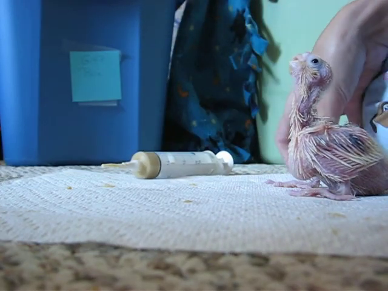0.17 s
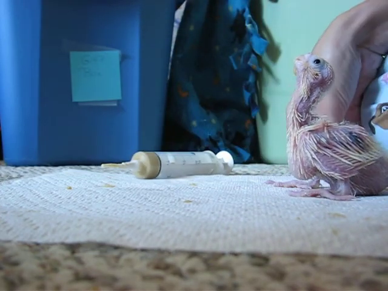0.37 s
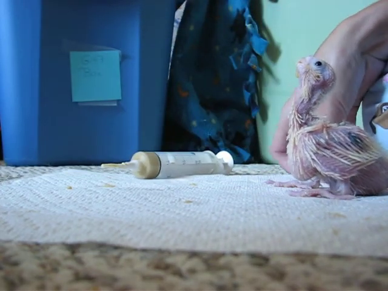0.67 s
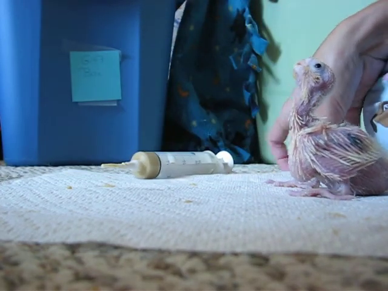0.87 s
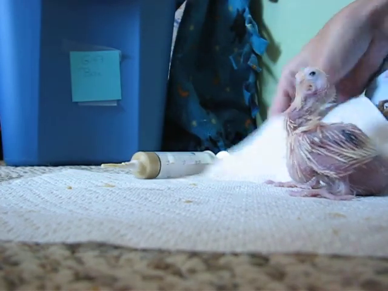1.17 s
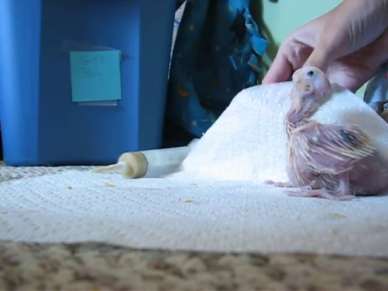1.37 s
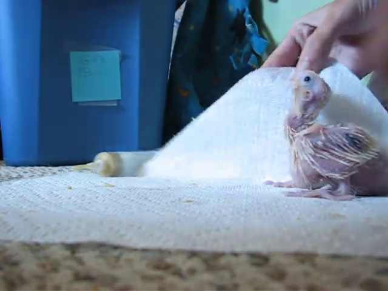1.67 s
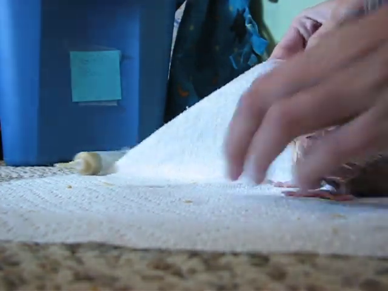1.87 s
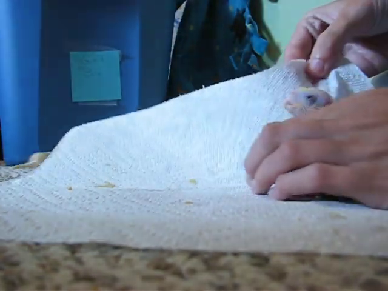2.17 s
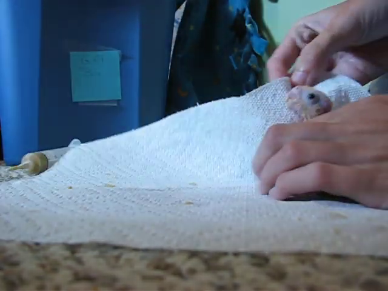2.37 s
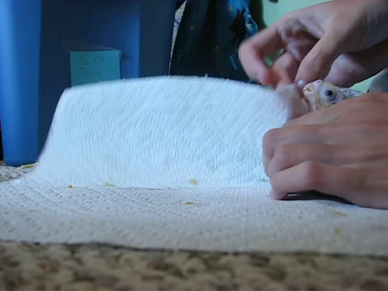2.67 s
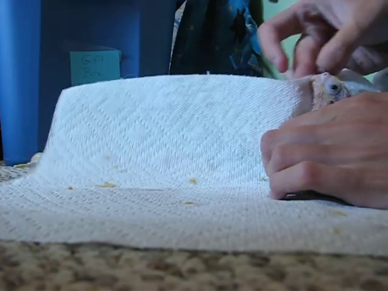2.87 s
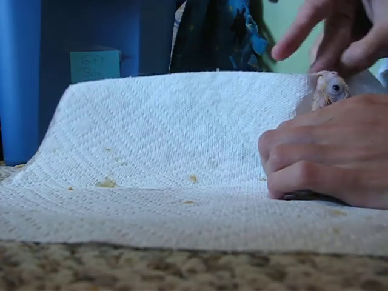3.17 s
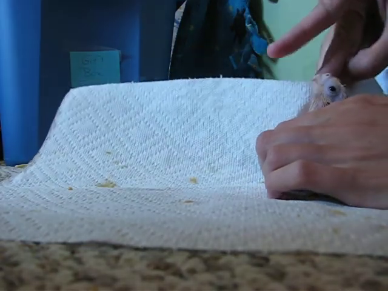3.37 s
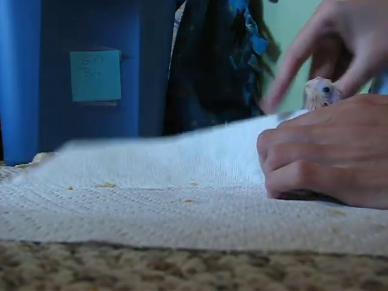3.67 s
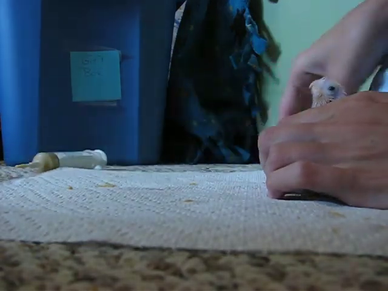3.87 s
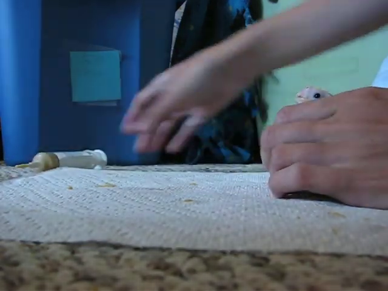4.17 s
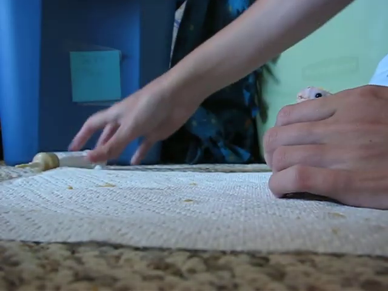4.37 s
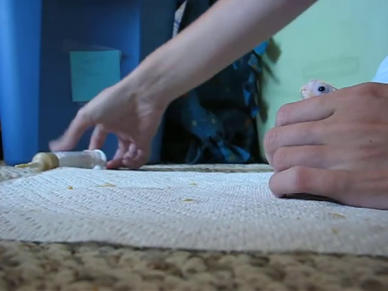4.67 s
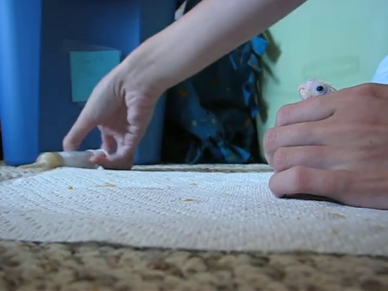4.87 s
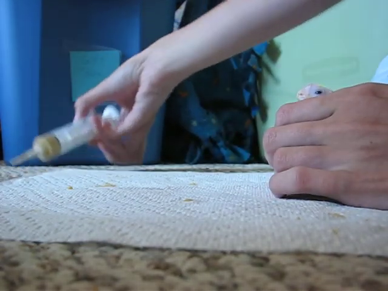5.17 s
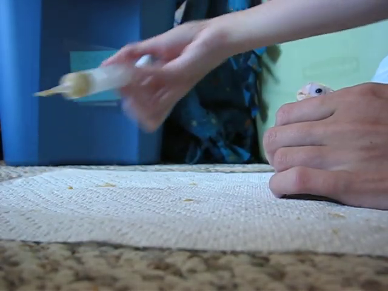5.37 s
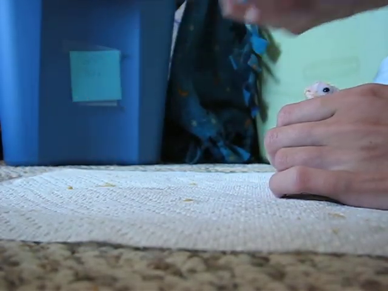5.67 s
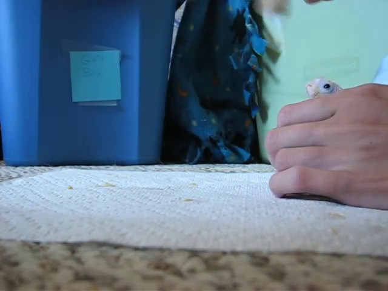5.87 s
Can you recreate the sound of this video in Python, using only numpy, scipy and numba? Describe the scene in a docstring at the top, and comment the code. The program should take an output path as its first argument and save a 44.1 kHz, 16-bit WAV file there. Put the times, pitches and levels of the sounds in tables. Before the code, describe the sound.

A baby bird squeaks thinly, then begs in raspy hissing calls over paper towel rustle, small taps and a faint appliance hum.

```python
"""A cockatiel chick begs on a paper towel, close to a small stereo camera; an appliance hums throughout.
Hands slide and fold the towel and things tap on the counter. From 0.8 s come thin squeaks that break up.
From 2.8 s the calls are rasps: each push of air drives irregular pulses through throat resonances
that glide as the beak opens and shuts. After 5 s a plastic syringe clicks, then comes a last long rasp."""
import sys
import numpy as np
from scipy import signal
from scipy.fft import rfft, irfft
from scipy.io import wavfile
from scipy.ndimage import uniform_filter1d
from numba import njit

SR = 44100
rng = np.random.default_rng(int(sys.argv[2]) if len(sys.argv) > 2 else 0)


def log_audio(samples):
    """Write samples as a 16-bit WAV file to the path given in sys.argv[1]."""
    # one column per channel
    frames = np.atleast_2d(samples).T
    # limit to full scale, then quantise
    limited = np.clip(frames, -1, 1)
    pcm = np.round(limited * 32767).astype(np.int16)
    wavfile.write(sys.argv[1], SR, pcm)


N = 264864
T = np.arange(N) / SR


def undb(db):
    """Decibels to gain."""
    return 10 ** (np.asarray(db) / 20)


def unit(x):
    """Scale to rms 1."""
    return x / np.sqrt(np.mean(x ** 2))


def ramp(start_s, length_s):
    """Linear rise from 0 to 1, at least 1 ms long."""
    return np.clip((T - start_s) / max(length_s, .001), 0, 1)


def walk(rate_hz):
    """Smooth random wander, rms 1."""
    step = max(int(SR / rate_hz), 2)
    stairs = np.repeat(rng.standard_normal(N // step + 1), step)
    return unit(uniform_filter1d(stairs, step)[:N])


def colour(x, outline, size=4096):
    """Minimum-phase filter from an outline of (f/Hz, level/dB)."""
    hz, db = np.transpose(outline)
    grid_hz = np.maximum(np.fft.rfftfreq(size, 1 / SR), 1)
    cepstrum = irfft(np.log(undb(np.interp(np.log(grid_hz), np.log(hz), db))))
    cepstrum[1:size // 2] *= 2
    cepstrum[size // 2 + 1:] = 0
    return signal.oaconvolve(x, irfft(np.exp(rfft(cepstrum))))[:len(x)]


@njit
def svf(x, hz, width_hz):
    """State-variable band-pass with a moving centre."""
    y = np.empty(len(x))
    band_state, low_state = 0., 0.
    for i in range(len(x)):
        g, damping = np.tan(np.pi * hz[i] / SR), width_hz / hz[i]
        band = (band_state + g * (x[i] + 1e-18 - low_state)) / (1 + g * (g + damping))
        band_state = 2 * band - band_state
        low_state += 2 * g * band
        y[i] = damping * band
    return y


def ring(x, hz, width_hz):
    """One resonance, gain 1 at its centre."""
    return svf(x, np.clip(hz, 20, SR / 2 - 2000) * np.ones(len(x)), float(width_hz))


def appliance():
    """Motor tones waver over a narrow fan rush."""
    # hum: f/Hz, rms level/dB, left minus right/dB
    tones = [(117.7, -68, -1), (139, -69.5, 1), (324, -56, -5.5)]
    hum = 0
    for hz, db, pan_db in tones:
        phase = 2 * np.pi * np.cumsum(hz * (1 + 0.00264 * walk(3.19))) / SR
        stereo_db = db + 0.039 * walk(2.25) + np.array([[pan_db], [-pan_db]]) / 2
        hum += np.sqrt(2) * np.sin(phase) * undb(stereo_db)
    rush = unit(ring(ring(rng.standard_normal(N), 297, 49), 349, 93))
    return hum + rush * undb([[-66.5], [-63]])


def noise_floor(rumble_db=-64.5, hiss_db=-59):
    """Rumble common to both microphone ports, hiss independent in each."""
    # room noise and microphone hiss: f/Hz, relative density/dB
    hiss_outline = [(30, -5), (300, 4), (700, 9.5), (1300, 1.5), (2500, 4), (5000, 1), (7800, 4),
                    (9500, -3), (12000, -6.5), (16000, -12.5)]
    rumble_outline = [(15, -15), (70, -2.5), (110, -5), (210, -5.5), (500, -11.5), (2000, -17),
                      (8000, -91)]
    rumble = unit(colour(rng.standard_normal(N), rumble_outline))
    hiss = np.array([unit(colour(rng.standard_normal(N), hiss_outline)) for _ in range(2)])
    return undb(rumble_db) * rumble + undb(hiss_db) * hiss


def blips(hz=366, period_s=.099, half_s=.016, fade_db_per_s=7, pan_db=-7):
    """Fading runs of soft, even blips, perhaps a small motor stepping."""
    # blip runs: start/s, end/s, first level/dB
    runs = [(0.187, .72, -53), (3.158, 3.6, -57.5), (4.052, 4.5, -58.5), (5.49, 5.95, -58)]
    gain = np.zeros(N)
    for start_s, end_s, db in runs:
        for s in np.arange(start_s, end_s, period_s):
            gain += undb(db - fade_db_per_s * (s - start_s)) * np.exp(-((T - s) / half_s) ** 2)
    phase = 2 * np.pi * np.cumsum(hz * (1 + 0.01415 * walk(8.6))) / SR
    return gain * np.sqrt(2) * np.sin(phase) * undb(np.array([[pan_db], [-pan_db]]) / 2)


def room(x, t60_s, wet_db, size=16000):
    """Short tail of scattered reflections, different at each port."""
    t = T[:size]
    tail = rng.standard_normal((2, size)) * np.exp(-np.log(1000) * t / t60_s) * (t > .002)
    tail *= undb(wet_db) / np.sqrt(np.sum(tail ** 2, axis=1, keepdims=True))
    return signal.oaconvolve(x[None], tail, axes=1)[:, :N]


def clutter(x):
    """Scatter from things nearby, shifting as head and hands move."""
    turn_rad = 2 * np.pi * 1.3 * T + .5 * walk(6)
    return sum(share * room(x, t60_s=.035, wet_db=-10.5)
               for share in (np.cos(turn_rad), np.sin(turn_rad)))


def echoes(x):
    """Early reflections comb the sound and blur its pulses."""
    # hard surfaces near the bird: delay/ms, signed gain
    surfaces = [(1.38, .05), (1.92, -.06), (2.36, .13), (2.56, -.13), (3.08, .08), (4.71, -.1), (12.8, .04)]
    return x + sum(gain * np.pad(x, (round(ms * SR / 1000), 0))[:N] for ms, gain in surfaces)


def nook(x):
    """The space between bird, boxes and counter adds narrow resonances."""
    # nook modes: f/Hz, width/Hz, level/dB re direct
    modes = [(980, 40, -4.5), (1560, 120, -14), (2100, 120, -21), (2810, 100, -16), (4120, 210, -7),
             (6500, 190, -13), (6750, 120, -15)]
    return x + sum(undb(db) * ring(x, hz, width_hz) for hz, width_hz, db in modes)


def ports(x):
    """Sound bends round the camera and reaches each port with its own level and lag."""
    # port response: f/Hz, left minus right/dB, left lead/rad
    response = [(100, -1, -4), (373, -3.5, -8), (670, 1.5, 0.44), (1106, -5, -0.5), (1450, 2, 0.7),
                (1670, -4.5, -0.9), (2350, -5, -0.6), (2720, -1.5, -2.5), (3560, -7.5, 1.2),
                (3730, -8, 1.5), (4530, 3, 0.4), (5230, 2.5, -1.1), (6800, -0.5, -1.62),
                (9500, -8.5, -1.77), (13000, 3.5, -1.5)]
    hz, pan_db, lead_rad = np.transpose(response)
    limit_rad = np.minimum(hz / 500, 2.2)  # long waves arrive together
    lead_rad = np.clip(lead_rad, -limit_rad, limit_rad)
    grid_hz = np.fft.rfftfreq(N, 1 / SR)
    ratio = undb(np.interp(grid_hz, hz, pan_db)) * np.exp(1j * np.interp(grid_hz, hz, lead_rad))
    return irfft(rfft(x) * 2 * np.array([ratio, np.ones_like(ratio)]) / (1 + ratio), N)


def towel(snags_per_s=4500, scatter_db=1.0, patchy_db=0.6):
    """Skin drags over paper fibres: dense tiny snags, in strokes that swell and run out."""
    # hand strokes: t/s, rise/s, fall/s, level/dB, treble/dB re level
    strokes = [(-.01, 0.0087, 0.17, -55, 0.5), (0.129, 0.011, 0.038, -52, -7),
               (0.18, 0.019, 0.15, -52.5, -3.5), (0.358, 0.042, 0.064, -48, -6),
               (.45, 0.018, 0.17, -63, -16), (0.524, 0.026, 0.036, -49.5, -7),
               (0.593, 0.018, 0.065, -50, -4), (.65, 0.009, 0.039, -44, -4.5), (.69, 0.096, 0.055, -52, -7),
               (.85, 0.013, 0.15, -58.5, -18), (0.959, 0.044, 0.023, -52.5, -6.5),
               (1.155, 0.0042, 0.029, -60.5, 11.5), (1.2, 0.065, 0.39, -53, -6),
               (1.484, 0.025, 0.15, -49, -4), (1.7, 0.046, 0.18, -59.5, -3.5),
               (1.92, 0.02, 0.51, -50.5, -5), (2.3, 0.072, 0.14, -54, -6), (2.451, 0.015, 0.3, -51.5, -1.5),
               (2.688, 0.011, 0.08, -53, -2), (2.77, 0.033, 0.21, -66.5, 10.5),
               (3.2, 0.086, 0.17, -60.5, -8), (3.62, 0.11, 0.17, -57, -3.5), (3.93, 0.033, .42, -74, -4),
               (5.03, 0.015, 0.057, -59, -19), (5.17, 0.044, 0.06, -80, 9),
               (5.32, 0.057, 0.082, -68.5, 14.5), (5.44, 0.04, 0.061, -72, 12),
               (5.56, 0.048, .09, -73.5, 11)]
    # paper spectrum, body and treble: f/Hz, level/dB
    body_outline = [(240, -33.5), (400, -8.5), (674, -3.5), (990, -7.5), (1390, -2), (1710, -8),
                    (1870, -5.5), (6000, -11), (7800, -24.5), (13200, -120)]
    treble_outline = [(4000, -34.5), (6000, -3), (6800, 2), (7700, 2), (9000, -5.5), (11000, -14.5),
                      (16000, -26)]
    body_power, treble_power = np.zeros(N), np.zeros(N)
    for s, rise_s, fall_s, db, treble_db in strokes:
        stroke = undb(db) * ramp(s, rise_s) * (1 - ramp(s + rise_s, fall_s)) ** .55
        body_power += stroke ** 2
        treble_power += (stroke * undb(treble_db)) ** 2
    sizes = undb(scatter_db * np.minimum(rng.exponential(size=N), 5))
    caught = rng.random(N) < snags_per_s / SR
    snags = caught * sizes * rng.standard_normal(N) * undb(patchy_db * walk(70))
    body = np.sqrt(body_power) * unit(colour(snags, body_outline))
    return body + np.sqrt(treble_power) * unit(colour(snags, treble_outline))


def blow(s, peak_db, hz, t60_s, outline, scrape, ring_db, damping, size=4096):
    """An impact and its decaying scrape, coloured by a body and one damped ring."""
    force = scrape * rng.standard_normal(size) * np.exp(-np.log(1000) * T[:size] / t60_s)
    force[0] += 1
    sound = colour(force, outline)
    sound += undb(ring_db) * ring(sound, hz, damping * hz)
    out, start = np.zeros(N + size), int(s * SR)
    out[start:start + size] = undb(peak_db) * sound / np.abs(sound).max()
    return out[:N]


def contacts():
    """Dull taps on the padded counter, soft bumps of hands and bird, small sharp ticks."""
    # taps and bumps: t/s, peak/dB, ring f/Hz
    tap_hits = [(0.113, -35, 670), (0.6215, -37.5, 696), (0.662, -23, 850), (0.7975, -31, 700),
                (0.8305, -41, 680), (0.8497, -37, 800), (0.8905, -35, 1100), (0.9005, -40, 620),
                (0.973, -37, 700), (0.978, -39, 650), (1.0015, -34, 600), (1.009, -35.5, 600),
                (2.034, -41, 830), (2.404, -42, 700), (4.818, -38, 939), (5.029, -24.5, 1400)]
    bump_hits = [(1.004, -43.5, 240), (1.997, -46, 230), (3.551, -43, 110), (3.648, -41.5, 129),
                 (3.79, -50, 200), (4.438, -58, 60), (4.609, -47, 59.7), (4.809, -40, 242),
                 (5.029, -42, 260)]
    # ticks of beak, throat, paper and plastic: t/s, peak/dB, ring f/Hz, scrape t60/s
    tick_hits = [(0.585, -35.5, 5300, 0.029), (0.774, -33, 4640, 0.02), (0.799, -35, 1690, 0.01),
                 (1.042, -36, 4370, 0.025), (1.161, -35.5, 5370, 0.033), (1.507, -34, 8160, 0.022),
                 (1.833, -34.5, 7700, 0.011), (1.883, -38, 1570, 0.011), (1.938, -38, 1550, 0.011),
                 (2.042, -33, 3500, 0.013), (2.132, -39, 6000, .01), (2.176, -31, 2540, 0.0066),
                 (2.269, -32, 2000, 0.018), (2.372, -40, 2900, .012), (2.404, -31.5, 6340, 0.015),
                 (2.5126, -29.5, 1663, 0.017), (2.533, -30.5, 1490, 0.025), (2.578, -32, 2000, 0.012),
                 (2.781, -31, 3730, 0.03), (2.847, -31.5, 6900, 0.014), (3.056, -40, 1430, 0.05),
                 (3.096, -38.5, 1500, 0.017), (3.114, -36, 1420, 0.017), (3.463, -29.5, 3600, 0.02),
                 (4.136, -42, 7760, 0.02), (4.469, -22.5, 2800, 0.011), (5.418, -30, 1730, 0.053)]
    # spectra of the struck bodies: f/Hz, level/dB
    tap_body = [(80, -57), (200, 4.5), (450, 3), (680, 5.5), (1300, 2), (2200, -0.5), (4000, -17.5),
                (8000, -29), (14000, -63)]
    bump_body = [(30, -34), (220, -8.5), (400, -10.5), (2000, -33)]
    tick_body = [(300, 0), (900, 10), (1800, 7.5), (4500, -1.5), (7800, 8), (10000, -12), (16000, -32)]
    taps = sum(blow(*hit, 0.012, tap_body, scrape=0.06, ring_db=2, damping=0.4) for hit in tap_hits)
    bumps = sum(blow(*hit, 0.13, bump_body, scrape=1, ring_db=10, damping=1) for hit in bump_hits)
    ticks = sum(blow(*hit, tick_body, scrape=0.12, ring_db=8, damping=0.038) for hit in tick_hits)
    return taps + bumps + ticks


def syringe(cutoff_hz=9450):
    """Fingers and plunger knock the plastic barrel, which rings briefly; soft skin dulls the knock."""
    # clicks on picking it up: t/s, peak/dB
    clicks = [(5.077, -43), (5.117, -58), (5.193, -43), (5.253, -44), (5.3066, -30)]
    # barrel modes: f/Hz, width/Hz, level/dB
    modes = [(1270, 130, 2), (2500, 500, -12), (7400, 1400, -6)]
    knocks = np.zeros(N)
    for s, db in clicks:
        knocks[int(s * SR)] = undb(db)
    barrel = sum(undb(db) * ring(knocks, hz, width_hz) for hz, width_hz, db in modes)
    barrel = signal.sosfilt(signal.butter(4, cutoff_hz, fs=SR, output="sos"), barrel)
    return barrel * knocks.max() / np.abs(barrel).max()


def squeaks(flutter_hz=900, arch_per_s=0.87, edge_s=.002, throat_cutoff_hz=9000):
    """Arched glides of a tone and its octave, pure or hoarse; the two sides of the syrinx may overlap."""
    # squeaks: t/s, length/s, start f/Hz, end f/Hz, level/dB, octave/dB re level, roughness
    glides = [(0.774, 0.0058, 5220, 4230, -41.5, -14, 0.3), (1.037, 0.016, 3260, 4030, -52, -17, .4),
              (1.046, 0.0082, 4250, 4550, -41.5, -2.5, 0.6), (1.059, 0.0187, 4200, 5580, -46, -4, .7),
              (1.072, 0.01, 3690, 4040, -42, 1.5, 0.9), (1.077, 0.0364, 4200, 4230, -42, -14, 0.7),
              (1.082, 0.017, 5610, 5710, -30.5, -36, 0.06), (1.099, 0.0137, 5700, 5650, -41, -36, 0.2),
              (1.114, 0.0125, 5520, 3950, -40, -26, 0.35), (1.273, 0.012, 4200, 4230, -50.5, -13, 0),
              (1.513, 0.019, 3280, 3580, -52, 6, 0.5), (1.527, 0.017, 4000, 3970, -41.5, 6, 0),
              (1.547, 0.0059, 4050, 4060, -40, -1, 0.7), (1.553, 0.055, 4250, 4180, -50.5, -16, 0.84),
              (2.839, 0.029, 3380, 3650, -59, 4, 0.6), (2.857, 0.033, 3410, 3910, -46, -5, .65),
              (2.952, 0.09, 2930, 3280, -60, -5, 0.83), (3.468, 0.034, 3610, 3750, -49.5, -11, 0.6),
              (3.5, 0.044, 7080, 5880, -43, -40, 0.9), (3.666, 0.012, 3580, 3300, -62, -14, .6),
              (3.733, 0.0083, 3150, 3230, -53, -14, .6), (3.812, 0.039, 7500, 5920, -46, -40, 1.1),
              (4.47, 0.0069, 2770, 2900, -44.5, -13, .4), (4.642, 0.042, 5500, 7860, -46, -40, 1.1),
              (5.7178, 0.0048, 1850, 1820, -39.5, -12, 0.2), (5.732, 0.022, 3780, 3500, -49, -1, 0.6)]
    out = np.zeros(N)
    flutter = [(walk(flutter_hz) + 1j * walk(flutter_hz)) / np.sqrt(2) for _ in range(2)]
    for s, length_s, from_hz, to_hz, db, octave_db, rough in glides:
        on = (T > s) & (T < s + length_s)
        along, rough = ramp(s, length_s)[on], np.clip(rough, 0, 1)
        arch = 1 + arch_per_s * length_s * np.sin(np.pi * along)
        hz = (from_hz + (to_hz - from_hz) * along) * arch
        phase = 2 * np.pi * np.cumsum(hz) / SR
        fade = np.minimum(np.minimum(along, 1 - along) * length_s / edge_s, 1)
        for k, partial_db in ((1, db), (2, db + octave_db)):
            tone = np.exp(1j * k * phase) * (np.sqrt(1 - rough ** 2) + rough * flutter[k - 1][on])
            damping = np.sqrt(1 + (k * hz / throat_cutoff_hz) ** 20)
            out[on] += np.sqrt(2) * tone.imag * fade * undb(partial_db) / damping
    return out


def syrinx(rattle_db, slaps_per_s=660, jitter=.33, scatter_db=1.3, puff_s=.001):
    """Membranes slap shut unevenly, air hisses after each slap, and the flow chokes in a rattle."""
    spacing, size = rng.standard_normal((9000, 2)).T
    at = np.cumsum(SR / slaps_per_s * np.exp(jitter * spacing)).astype(int)
    pulses = np.zeros(N)
    pulses[at[at < N]] = undb(scatter_db * size[at < N])
    puffs = signal.lfilter([1], [1, -np.exp(-1 / (puff_s * SR))], pulses)
    flow = undb(rattle_db * (.35 - np.maximum(walk(260), 0)))
    return flow * unit(pulses.mean() - pulses), flow * unit(puffs * rng.standard_normal(N))


def catches():
    """Air-flow gain: the throat closes for a moment and the rasp stutters."""
    # closures: t/s, half length/s, depth/dB
    closures = [(4.5225, 0.0033, -14), (4.5485, .0018, -8), (4.5605, 0.0028, -9), (4.631, .0018, -10),
                (5.8245, 0.0044, -10), (5.8605, 0.0024, -15), (5.8965, 0.0016, -10)]
    return undb(sum(db * np.exp(-((T - s) / half_s) ** 2) for s, half_s, db in closures))


def breath_and_beak(onset_db=-9.5, end_db=-16, swell_db=2.5, edge_s=0.0004):
    """Air swells and dies as the beak opens and shuts: gains and centres of the four resonances."""
    # pushes of air: t/s, attack/s, hold/s, release/s, level/dB, share of length at widest beak,
    # low start f/Hz, low end f/Hz, middle f/Hz at widest beak,
    # then level offsets: middle/dB, top start/dB, top end/dB, nasal/dB
    pushes = [(1.033, 0.016, 0.025, 0.011, -57, 0.78, 3000, 3000, 3900, 13.5, 6, 16, -11),
              (1.082, 0.031, 0.022, 0.073, -54.5, 0.38, 3030, 3000, 4170, 8.5, -5, 0, -25),
              (1.524, 0.024, 0.014, 0.069, -46, 0.82, 2380, 2560, 4130, -1, 11, -7, -12),
              (2.79, 0.022, 0.0073, 0.021, -45.5, 0.11, 2350, 1730, 3800, -1, -21, -21, -15),
              (2.853, 0.014, .008, 0.023, -48, 0.82, 3000, 2900, 3800, 11, 9, -5, -17),
              (2.87, 0.023, 0.031, 0.029, -42, 0.13, 2250, 2000, 3630, -2.5, -15, -11, -13),
              (2.923, 0.014, 0.056, 0.048, -48.5, 0.41, 2320, 2580, 3020, -2, -28, -15, -20),
              (3.462, 0.021, 0.096, 0.072, -40.5, 0.51, 2560, 1410, 3770, -3, -5.5, -2.5, -17),
              (3.607, 0.032, 0.012, 0.035, -44.5, 1, 1450, 1310, 3640, -0.5, -6, -3, -16),
              (3.74, 0.013, 0.14, 0.053, -39, 1, 1430, 2370, 4080, -9, -5, -3.5, -8),
              (3.79, 0.02, 0.038, 0.071, -45.5, 0.7, 1670, 1750, 4010, 8.5, 9, 9, 5.5),
              (4.464, 0.0034, 0.03, 0.0055, -50.5, 0.94, 2920, 3080, 3500, 9, -13, 14, -24),
              (4.497, 0.001, 0.17, 0.058, -36, 0.076, 2330, 1730, 4440, -10, -6, -6.5, -12.5),
              (4.624, 0.013, 0.032, 0.013, -45.5, 0.3, 1950, 1850, 5400, 4, -4, 11.5, -2),
              (4.745, 0.017, 0.22, .064, -37.5, 0.65, 1480, 2030, 4300, -17, -3.5, -4.5, -16),
              (4.786, 0.026, 0.04, 0.16, -39.5, 0.42, 1750, 1980, 4700, -8, 3, 5.5, -3),
              (4.963, 0.01, 0.0072, 0.0073, -50, .2, 1700, 1650, 4570, -6, 12, 7, -12),
              (5.716, 0.002, 0.0048, 0.0017, -51.5, .9, 1930, 1900, 3900, 4, 8, 9, 6.5),
              (5.733, 0.0012, 0.0029, 0.0018, -49.5, 0.55, 1900, 1900, 3760, 6, 12, 6, 4),
              (5.745, 0.0016, 0.16, 0.063, -39, 0.21, 2810, 1560, 4900, -7, -4, 1.5, -9.5),
              (5.919, 0.064, 0.33, 0.05, -41, 1, 1590, 1550, 4000, -22, -1, 2, -2.5)]
    power, weighted_hz = np.zeros((4, N)), np.zeros((4, N))
    for (s, attack_s, hold_s, release_s, db, widest, from_hz, to_hz,
         middle_hz, middle_db, top_from_db, top_to_db, nasal_db) in pushes:
        length_s = attack_s + hold_s + release_s
        on = (T > s) & (T < s + length_s)
        along = ramp(s, length_s)[on]
        rising, dying = ramp(s, attack_s)[on], ramp(s + attack_s + hold_s, release_s)[on]
        opening = np.interp(along, [0, np.clip(widest, .1, .9), 1], [0, 1, 0])
        beak = np.sin(np.pi / 2 * opening) ** 2  # 0 shut, 1 wide
        push_db = db + onset_db * (1 - rising) ** 0.69 + end_db * dying ** 1.55 + swell_db * (beak - .5)
        top_db = top_from_db + (top_to_db - top_from_db) * along - 17 * dying  # dies first
        gate = (ramp(s, edge_s) - ramp(s + length_s - edge_s, edge_s))[on]
        # rows: low, middle, top, nasal
        gain = gate * undb([push_db - 2.5,
                            push_db - 4 + middle_db - 5 * (1 - beak),  # muffled by a shut beak
                            push_db - 1.5 + top_db,
                            push_db + nasal_db])
        centre_hz = np.array([from_hz + (to_hz - from_hz) * along,
                              middle_hz * np.interp(beak, [0, 1], [0.92, 1]),
                              np.interp(beak, [0, 1], [7420, 6120]),
                              np.interp(beak, [0, 1], [1890, 2030])])
        power[:, on] += gain ** 2
        weighted_hz[:, on] += gain ** 2 * centre_hz
    centres_hz = [np.interp(T, T[p > 0], hz[p > 0] / p[p > 0]) for p, hz in zip(power, weighted_hz)]
    return np.sqrt(power), centres_hz


def rasps(slack_hz=2140, tight_hz=2550, low_air=.55, high_air=.85):
    """Rough pulses ring three gliding throat resonances and a narrow nasal one."""
    # lower throat response and treble roll-off of the voice: f/Hz, level/dB
    throat_outline = [(100, -46), (220, -9), (420, -8.5), (650, 0), (1150, -3), (1650, -1), (2150, -8.5),
                      (2550, -5.5), (3000, -6), (3600, -7), (5000, -9), (9000, -31.5)]
    top_outline = [(2500, -23.5), (4500, 0.5), (5500, 2), (8200, 6), (9200, -1.5), (10200, -7.5),
                   (12000, -15.5), (16000, -24)]
    gains, (low_hz, middle_hz, top_hz, nasal_hz) = breath_and_beak()
    low_gain, middle_gain, top_gain, nasal_gain = gains
    # a tight throat rattles more, loses its broad bass and keeps its ring
    tight = np.interp(low_hz, [slack_hz, tight_hz], [0, 1])
    slaps, hiss = syrinx(rattle_db=.4 + 2 * tight)
    source = slaps + high_air * hiss
    quiver = 1 + .025 * walk(70)
    bass = colour(slaps + low_air * hiss, throat_outline)
    low = unit(undb(-4.5 * tight) * bass + undb(12) * ring(bass, low_hz * quiver, 1090))
    middle = unit(ring(ring(source, middle_hz * quiver, 830), middle_hz, 1800))
    top = unit(colour(ring(source, top_hz * quiver, 1670), top_outline))
    nasal = unit(ring(ring(source, nasal_hz * quiver, 440), nasal_hz, 880))
    voice = catches() * (low_gain * low - middle_gain * middle + top_gain * top + nasal_gain * nasal)
    voice -= 2 * ring(voice, low_hz, width_hz=600)  # all-pass: the throat holds each pulse back
    return voice - .45 * ring(voice, hz=3550, width_hz=350)  # side-cavity notch


def scene():
    """Bird and handling close to the camera, among boxes in the humming room."""
    bird = echoes(nook(rasps()) + squeaks())
    near = bird + towel() + contacts() + syringe()
    stereo = ports(near) + clutter(near) + room(near, t60_s=.22, wet_db=-14)
    return stereo + appliance() + noise_floor() + blips()


def record(dry):
    """The camera cuts the treble above 15.8 kHz."""
    return signal.sosfilt(signal.ellip(10, .2, 70, 15800, fs=SR, output="sos"), dry)


dry = scene()
out = record(dry)
log_audio(out)
```